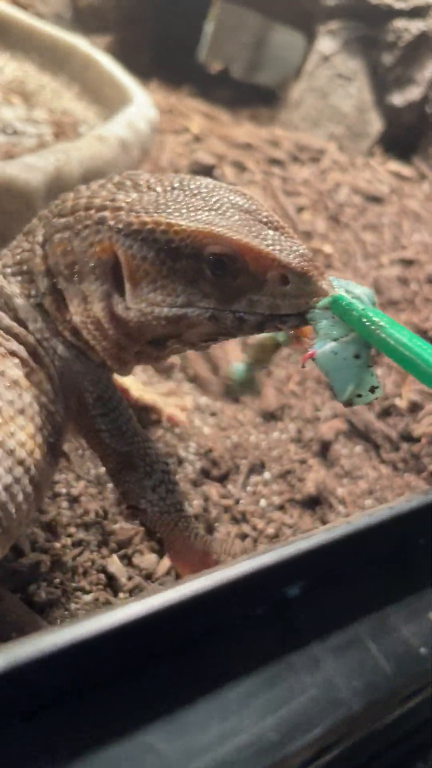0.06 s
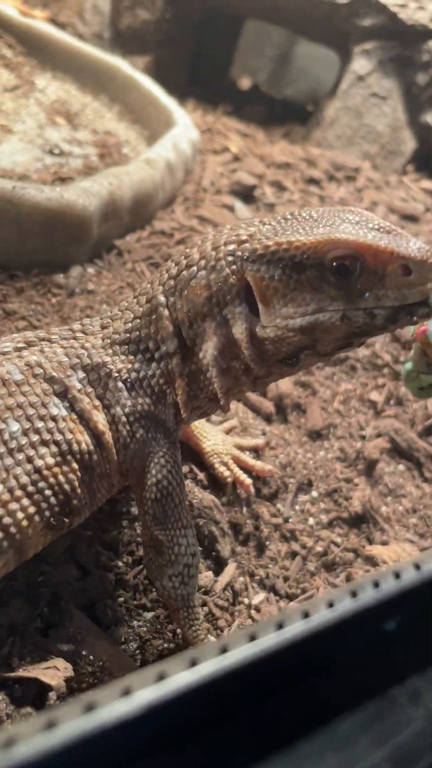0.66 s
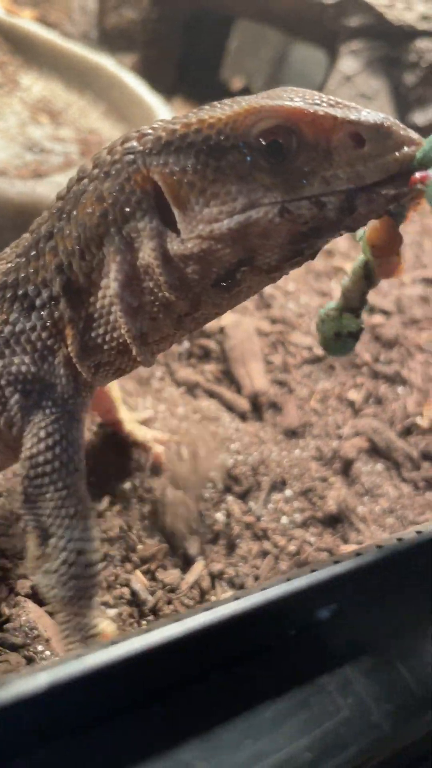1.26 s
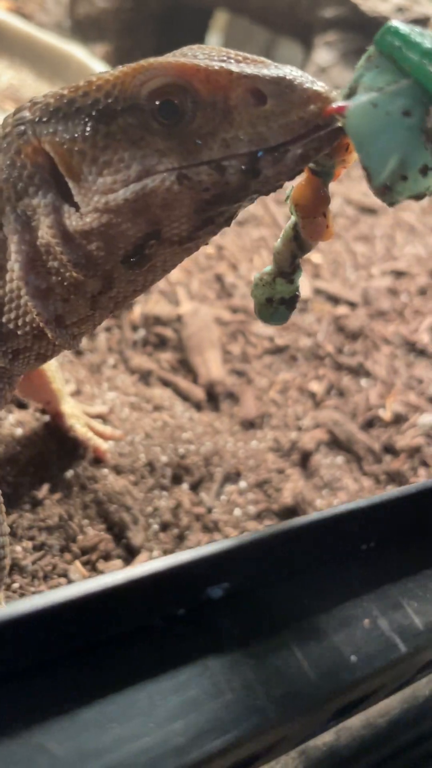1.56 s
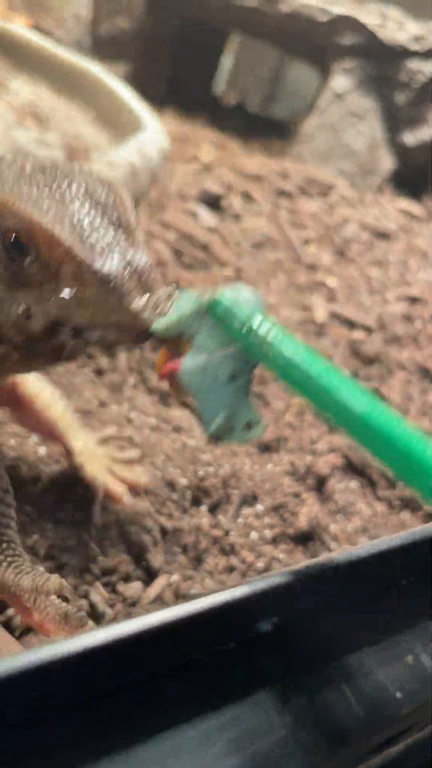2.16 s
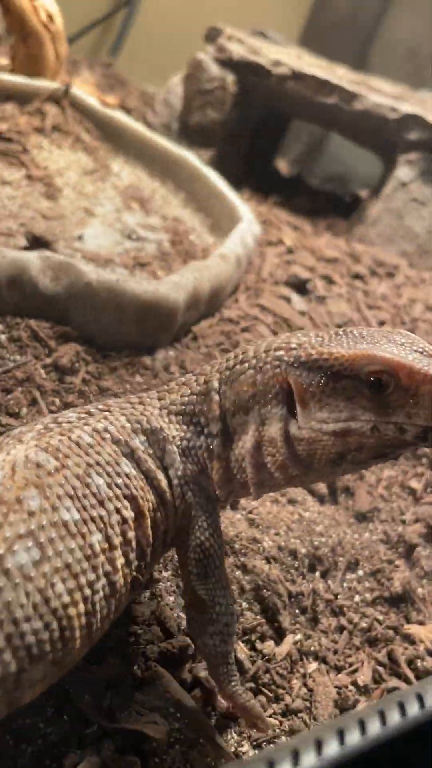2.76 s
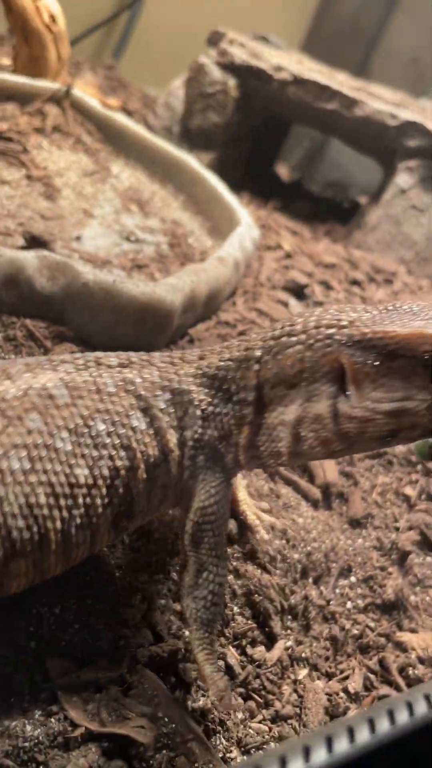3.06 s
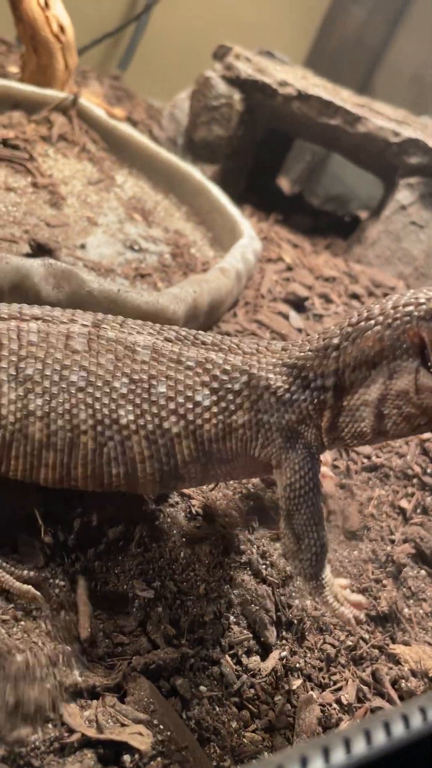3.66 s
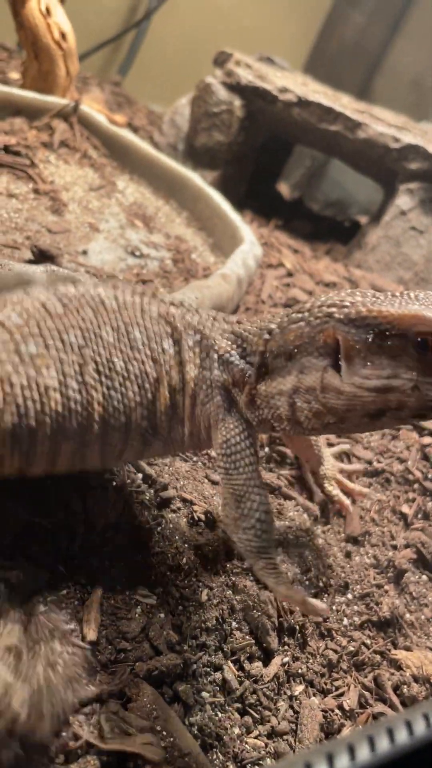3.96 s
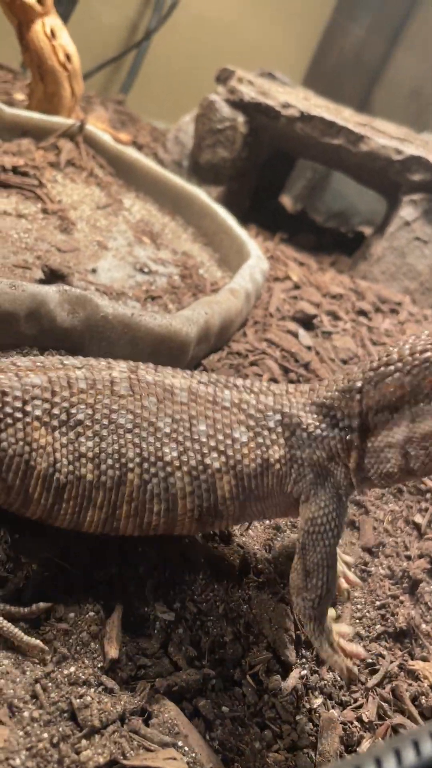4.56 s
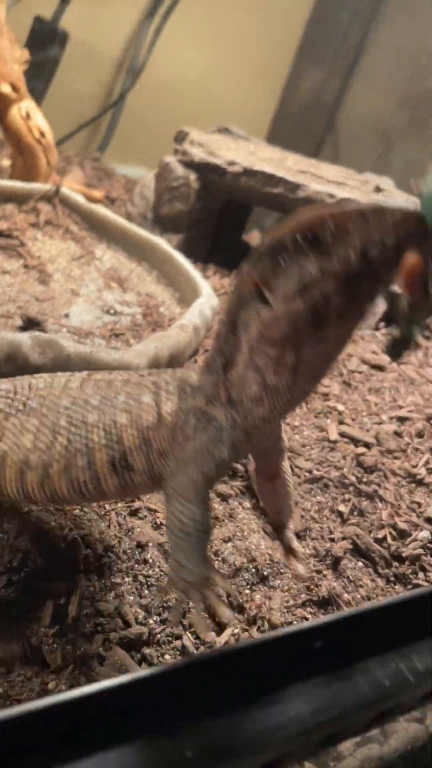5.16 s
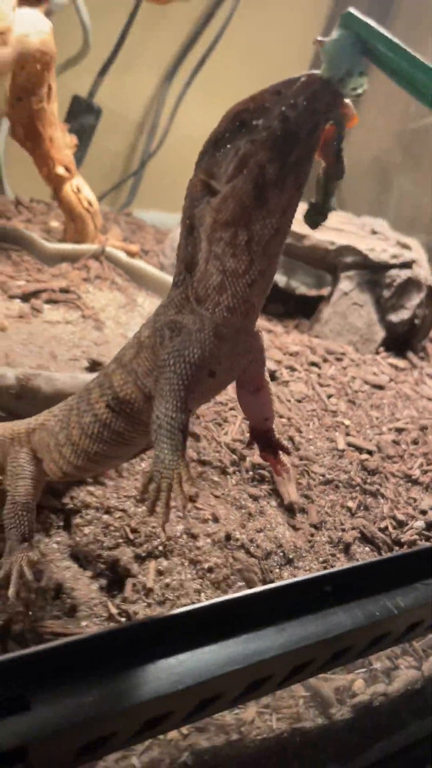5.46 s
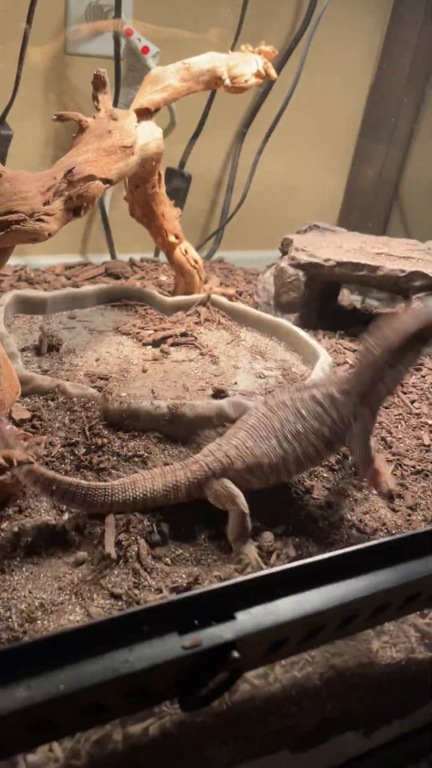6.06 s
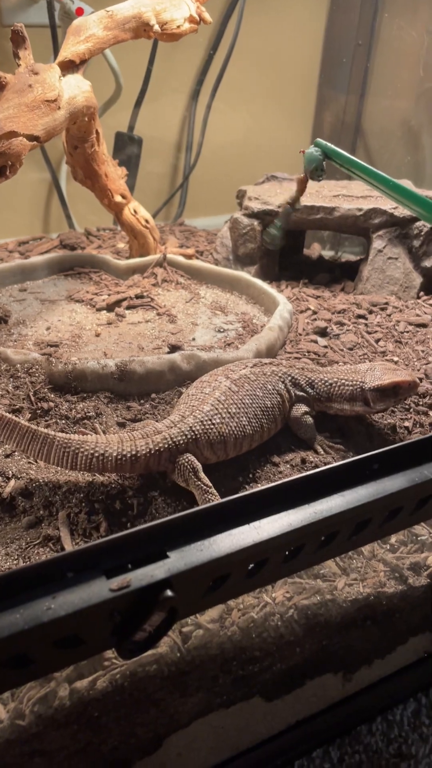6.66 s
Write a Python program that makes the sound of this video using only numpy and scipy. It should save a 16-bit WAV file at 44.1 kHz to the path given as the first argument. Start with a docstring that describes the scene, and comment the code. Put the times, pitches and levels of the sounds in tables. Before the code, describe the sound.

A lizard moves through bark litter in a glass tank, heard close over a faint, low room hum. At about 0.2 seconds plastic tongs knock on the tank in a quick clatter, amid claw scratches, soft thuds and snapping chips. It goes quieter around 1 second, with thin rubbing and tiny clicks from the tongs. Sharper clicks start at 2 seconds and lead to a hard clack and knock at 2.3. From 2.4 to 4.7 seconds the claws scrabble lightly and feet thud, with the crackling of bark thickest between 3.4 and 4. From about 5 seconds the belly drags with a soft rasp. At 6.1 comes the loudest sound, a sharp knock as the lizard drops, ringing the panes and making the whole tank boom. One small click follows at 6.4, then a faint, dull rustle as the tongs withdraw.

```python
"""Claws scrabble in bark litter, over a quiet room hum: a monitor lizard in a glass tank, close to a phone.
Feet thud, chips snap and the belly drags as it tugs at a worm held in plastic tongs.
The tongs knock on the tank, rub and click; each knock rings the panes and the floor.
At last the lizard lets go and drops, the whole tank booms, and the tongs rustle as they are drawn back."""
import sys
import numpy as np
from scipy import signal
from scipy.fft import rfft, irfft, next_fast_len
from scipy.io import wavfile
from scipy.ndimage import uniform_filter1d, map_coordinates

SR = 44100
rng = np.random.default_rng(int(sys.argv[2]) if len(sys.argv) > 2 else 0)


def generate_wav(signal):
    """Clip the signal to [-1, 1] and save it as 16-bit WAV at the path in sys.argv[1]."""
    frames = np.transpose(np.atleast_2d(signal))
    scaled = np.clip(frames, -1, 1) * 32767
    pcm = np.round(scaled).astype(np.int16)
    wavfile.write(sys.argv[1], SR, pcm)


N = 304731

# claw strokes; belly and tail drags: (time [s], length [s], scraping [dB], crumbs [dB])
CLAW_STROKES = [(-.02, 0.07, -56, -59.5), (.09, 0.11, -72.5, -68.5), (.21, 0.26, -65.5, -63.5),
                (.465, 0.12, -61.5, -63.5), (.61, 0.24, -72.5, -66.5), (.93, 0.13, -79, -76),
                (1.24, 0.072, -89, -75.5), (1.872, 0.14, -69, -63.5), (1.965, 0.053, -66, -60.5),
                (2.05, 0.077, -78, -71), (2.14, 0.23, -68, -64.5), (2.39, 0.34, -74, -69),
                (2.765, 0.11, -65, -62), (3.06, 0.35, -70, -67), (3.345, 0.15, -62, -63.5),
                (3.53, 0.12, -60.5, -59.5), (3.71, 0.14, -70, -67.5), (3.9, 0.046, -63, -58),
                (3.94, 0.051, -59, -54.5), (4.0, 0.055, -63.5, -67), (4.265, 0.066, -72.5, -67),
                (4.4, 0.29, -73, -69), (5.11, 0.18, -67, -84)]
BELLY_DRAGS = [(2.93, 0.066, -72, -70.5), (4.24, 0.0089, -68, -62), (4.88, 0.23, -77.5, -89),
               (5.045, 0.14, -69.5, -64), (5.15, 0.24, -61.5, -66), (5.51, 0.33, -62, -60.5),
               (5.92, 0.16, -60.5, -67), (6.15, 0.24, -66.5, -86), (6.76, 0.082, -74.5, -75)]
# footfalls and tugs on the tank floor: (time [s], ring [dB], thud [dB])
FOOTFALLS = [(0.041, -67, -54.5), (0.202, -64, -52), (0.5, -62, -59), (.522, -54, -46.5), (1.967, -57, -61),
             (2.034, -76, -54.5), (2.271, -48, -65), (2.78, -69, -65), (3.449, -57.5, -62),
             (3.551, -60, -60.5), (3.735, -61, -60.5), (3.85, -59, -58), (3.924, -59, -66),
             (4.06, -58, -55.5), (4.63, -57, -59), (5.225, -56.5, -54)]
# bark chips breaking: (time [s], level [dB], tilt [dB/octave])
CHIP_SNAPS = [(0.0702, -43, 0), (.519, -53, -3), (.5305, -48.5, -2.5), (.545, -42.5, 0.5), (0.5515, -40, 7),
              (0.338, -49, 14), (2.4036, -51.5, 6), (2.57, -52, 3), (2.866, -52.5, 1.5), (3.388, -50.5, -2),
              (3.425, -51, 0), (3.499, -49, -2), (3.5516, -42.5, -2.5), (3.604, -50, -1), (3.615, -46.5, 1),
              (3.625, -53, -1), (3.782, -52, 0.5), (3.817, -55, -1), (3.873, -49, 3.5), (3.879, -56, 8),
              (3.901, -41.5, 6.5), (3.934, -43.5, 8), (3.941, -41, -0.5), (3.947, -43.5, 0),
              (3.975, -47, 12), (3.993, -47, 16), (4.459, -49, 12), (4.662, -55, 8), (4.679, -46, -1.5),
              (6.446, -56, 14)]
# blows on the tank:
# (time [s], crack [dB], clack [dB], rattle [dB], decay scale [x], tilt [dB/octave], boom [dB])
TANK_KNOCKS = [(0.1297, -51, -67, -75, 0.29, 3, -84), (0.1901, -34, -42.5, -53, 0.28, -1.5, -63),
               (0.203, -42, -63, -47, 0.54, 0.5, -55.5), (0.246, -49, -48, -62, 0.34, 4, -75),
               (1.392, -67, -93, -84, 0.4, -16, -75), (2.2541, -33, -35.5, -42, 0.25, 0.5, -42.5),
               (5.555, -53.5, -70, -85, 0.17, -7, -81), (5.93, -52, -63, -67.5, 0.59, -5.5, -62.5),
               (6.0751, -23, -26, -33.5, 0.73, 4, -26), (6.0848, -27, -32, -46, 0.86, -3, -53),
               (6.201, -51, -57, -57, 1, -2, -45)]
# tongs sliding under load: (time [s], length [s], level [dB])
TONG_SLIDES = [(.29, 0.17, -69.5), (1.01, 0.063, -78.5), (1.175, 0.12, -71.5), (1.272, 0.05, -68),
               (1.97, 0.033, -62.5), (2.46, 0.059, -64.5), (2.53, 0.06, -71.5)]
# tong and jaw contacts, plus the bright treble of the landing crack at 6.076 s: (time [s], level [dB], pitch
# [Hz], width [octaves], t60 [s], rattle [dB])
HARD_CLICKS = [(0.472, -51.5, 2676, 0.019, 0.064, -70), (1.1457, -54.5, 3580, 0.31, 0.023, -68),
               (1.163, -49.5, 3300, 0.19, 0.027, -74), (1.661, -60.5, 11100, 0.84, 0.0061, -101),
               (1.9927, -33, 6850, 0.68, 0.026, -62), (2.091, -47, 6160, 0.39, .014, -64),
               (2.113, -48.5, 5300, 0.4, 0.02, -84.5), (2.209, -50.5, 4300, 0.75, 0.027, -64.5),
               (2.2786, -23, 4150, 0.32, 0.019, -47.5), (2.2784, -28, 10000, 0.83, 0.014, -70),
               (5.446, -44, 3840, 0.42, 0.015, -59.5), (6.0759, -36, 10000, 0.48, .05, -75),
               (6.388, -53, 8000, .6, 0.0079, -90), (6.3977, -37, 5260, 0.69, 0.015, -89)]
# litter pushed aside: (time [s], level [dB], pitch [Hz], t60 [s])
FOOT_SCUFFS = [(2.759, -51, 2670, 0.17), (3.365, -52.5, 1890, 0.27), (5.333, -49, 5070, 0.18)]
# room hum: (frequency [Hz], level [dB])
HUM_TONES = [(59.5, -78), (362, -83.5)]

# modes of floor and walls, panes, glass front: (frequency [Hz], level [dB], t60 [s])
TANK_MODES = [(54.4, -20, 1.8), (87.2, -11.5, 1.0), (96.1, -7.5, 1.61), (105.5, 3.5, 0.33),
              (113.6, -5.5, .45), (142.3, -15.5, 0.67), (149.2, -6, 0.85), (168, -12, 1.1),
              (182, -12.5, 0.52), (200.1, -6, 0.75), (205.8, 0, 0.33), (218.7, -4, 0.54), (257, -19, 0.31),
              (275, -10, 0.52), (311.5, -27, 1.8)]
PANE_MODES = [(449, 9, 0.22), (480, 3.5, 0.56), (534, 6.5, 0.67), (560, -4.5, 0.99), (656, 8.5, 0.2),
              (717, 3.5, 0.45), (817, 6.5, 0.32), (1103, 2, 0.66), (1318, 11.5, 0.18), (1556, 4, 0.23),
              (1813, 11, 0.2), (1870, -3, 0.14), (2260, 2.5, 0.15), (2300, 4.5, 0.29), (2840, 1, 0.14),
              (3120, 9, 0.28)]
FRONT_MODES = [(406.6, -10, 0.079), (690, -27.5, .05), (1223, -2.5, 0.034), (1786, -3, 0.055),
               (2300, -9.5, 0.079), (3550, 0.5, 0.015)]

# noise spectra, by source: (frequency [Hz], density [dB])
ROOM_SPECTRUM = [(20, -15.5), (60, 7.5), (110, 2), (200, -6), (380, -9), (600, -16), (1500, -21.5),
                 (4000, -28), (12000, -35), (16000, -39)]
CLAW_SPECTRUM = [(100, -18.5), (240, 2.5), (400, 9), (720, 1.5), (1050, 1.5), (1800, 2), (2750, 1.2),
                 (4000, -2.5), (5500, 2), (6700, -8), (8000, -15.5), (11000, -8.5), (16000, -5)]
BELLY_SPECTRUM = [(100, -20), (400, -11.5), (900, -0.5), (1600, 2.5), (2600, 7), (3500, 3.5), (5000, 4),
                  (6500, -2), (8000, -4.5), (11000, -7), (16000, -14.5)]
CRUMB_SPECTRUM = [(2000, -28), (5000, -3.5), (8000, 0), (11000, -2.5), (13500, -7), (15500, 1)]
CHIP_SPECTRUM = [(100, -14), (400, 4), (900, -2), (2500, -4), (5500, 0), (8000, -5), (11000, -7),
                 (16000, -11)]
WEIGHT_SPECTRUM = [(20, -22), (45, -1.5), (65, -4.5), (100, 4.5), (140, 0), (200, -11), (300, -13),
                   (500, -16), (1200, -42)]
THUD_SPECTRUM = [(20, -24), (45, -8), (65, 7), (110, 5.5), (170, 7), (260, -15.5), (600, -34.5)]
CRACK_SPECTRUM = [(60, -18.5), (200, -15), (350, -7.5), (600, 3), (950, -1.5), (1700, 0.5), (2400, -3.5),
                  (3500, -3.5), (6000, -11.5), (9000, -20.5), (12000, -32.5), (16000, -25.5)]
TANK_RATTLE_SPECTRUM = [(40, -11.5), (150, -6), (330, 7), (600, 7), (1300, 6.5), (2500, 2), (4500, -1),
                        (7000, -8), (11000, -19.5), (16000, -33)]
RUMBLE_SPECTRUM = [(25, -22), (50, -9), (70, -1), (90, -5), (125, -1.5), (200, -2), (300, -10), (400, -24),
                   (1000, -54.5)]
SLIDE_SPECTRUM = [(1200, -32), (2700, -12), (3000, 1), (3450, 2), (3850, -8), (4450, -6), (4800, -14),
                  (5800, -14), (6600, -10), (8500, -19), (11000, -26), (15000, -33)]
TONG_RATTLE_SPECTRUM = [(1200, -30), (1650, -11), (2500, -3.5), (2900, -9), (3600, -1), (3950, -5),
                        (4450, 0), (5200, -14.5), (8000, -15), (9000, -21), (11000, -39), (16000, -47)]
RUSTLE_SPECTRUM = [(200, -17.5), (450, -4), (700, -4.5), (1200, -8.5), (2000, -7), (5000, -19),
                   (16000, -59)]

# decay of the tank air: (frequency [Hz], t60 [s])
AIR_T60_S = [(100, 0.58), (300, 1), (700, 0.82), (1500, 0.47), (4000, 0.38), (8000, 0.22), (16000, 0.51)]
# stereo position of the knocks: (frequency [Hz], left minus right [dB])
KNOCK_BALANCE_DB = [(60, -0.5), (150, -2), (380, -4), (950, 0.5), (2380, 0), (5980, -0.5), (15000, 2)]
# left-right likeness of near and far sound: (frequency [Hz], coherence [0-1])
NEAR = [(150, 0.97), (400, 0.45), (800, 0.23), (1500, 1), (3000, 0.9), (4300, 0.4), (6000, 1), (11000, 1),
        (16000, 1)]
FAR = [(150, 0.89), (350, 0.17), (700, 0.083), (1400, 0.47), (3000, 0.51), (5000, 0.51), (8000, 1),
       (16000, 0.41)]
# lead of the left microphone port: (frequency [Hz], phase [rad])
PORT_LEAD_RAD = [(0, 0), (1900, .05), (2900, .75), (4100, .65), (4900, 0), (7650, 3.14), (11000, 6.28),
                 (14300, 9.42), (16000, 10.8)]

FLOOR_DRIFT_HZ, PANE_DRIFT_HZ = 1.84, 3.5  # loose floor and panes never hold one pitch
FLOOR_PAN_DB = [[-.7], [.7]]  # left, right


def amp(db):
    """Decibels to gain."""
    return 10 ** (np.asarray(db) / 20)


def unit(x):
    """x at rms 1."""
    return x / np.sqrt(np.mean(x ** 2) + 1e-20)


def along(points, hz):
    """(Hz, value) points read on a log axis."""
    knots_hz, values = np.transpose(points)
    return np.interp(np.log(hz + 1), np.log(knots_hz + 1), values)


def wobble(knots_per_s):
    """Smooth random curve."""
    knots = rng.standard_normal(int(N * knots_per_s / SR) + 4)
    return map_coordinates(knots, [np.arange(N) * knots_per_s / SR])


def add(track, time_s, sound):
    """Mix a sound into the track."""
    start = max(0, round(time_s * SR))
    track[:, start:start + sound.shape[-1]] += sound[..., :N - start]


def filtered(x, response):
    """x through a frequency response."""
    size = x.shape[-1]
    padded = next_fast_len(size + 8192)
    return irfft(rfft(x, padded) * response(np.fft.rfftfreq(padded, 1 / SR)), padded)[..., :size]


def stereo(pair, colour_db, coherence):
    """Two unrelated signals, coloured and blended into left and right at rms 1."""
    angle = lambda hz: np.arccos(np.clip(along(coherence, hz), -1, 1)) / 2
    mid, side = filtered(pair, lambda hz: amp(colour_db(hz)) * [np.cos(angle(hz)), np.sin(angle(hz))])
    return unit(np.array([mid + side, mid - side]))


def noise(spectrum, coherence, size=N, tilt_db=0):
    """Shaped stereo noise, tilted per octave above 500 Hz."""
    colour_db = lambda hz: along(spectrum, hz) + tilt_db * np.log2(1 + hz / 500)
    return stereo(rng.standard_normal((2, size)), colour_db, coherence)


def fade(t60_s, attack_s):
    """Rise, then exponential decay."""
    t = np.arange(int(SR * np.clip(1.5 * t60_s, .05, 1.5))) / SR
    return np.exp(-np.log(1000) * t / t60_s) * (1 - np.exp(-t / attack_s))


def burst(spectrum, coherence, t60_s, attack_s, tilt_db=0):
    """Decaying puff of stereo noise."""
    envelope = fade(t60_s, attack_s)
    return envelope * noise(spectrum, coherence, len(envelope), tilt_db)


def ring(modes, attack_s, scatter_db, decay_scale=1, drift_hz=0):
    """Struck modes, each with random strength and optional pitch drift."""
    t = np.arange(SR) / SR
    knots_s = np.linspace(0, 1, 25)
    tones = np.zeros(SR)
    for hz, db, t60_s in modes:
        envelope = amp(db + scatter_db * rng.normal()) * np.exp(-np.log(1000) * t / (decay_scale * t60_s))
        drift_cycles = np.cumsum(rng.standard_normal(len(knots_s))) * drift_hz / len(knots_s)
        tones += envelope * np.sin(2 * np.pi * (hz * t + np.interp(t, knots_s, drift_cycles)))
    return tones * (1 - np.exp(-t / attack_s))


def effort(moves, rise_s, fall_db_per_s):
    """Movements swell, hold and die away; summed in power, one gain curve per dB column."""
    power = 0
    for time_s, length_s, *levels_db in moves:
        t = np.arange(N) / SR - time_s
        swell = (1 + np.tanh(t / (2 * rise_s))) / 2
        release = amp(-fall_db_per_s * np.maximum(t - length_s, 0))
        power += np.outer(amp(levels_db), swell * release) ** 2
    return np.sqrt(power)


def grains(spectrum, coherence, per_s, spread_db, bed_gain):
    """Tiny fractures of uneven size over a bed of finer friction."""
    sizes = amp(spread_db * np.minimum(rng.exponential(size=(2, N)), 4)) * rng.standard_normal((2, N))
    fractures = unit(sizes * (rng.random((2, N)) < per_s / SR))
    friction = bed_gain * rng.standard_normal((2, N))
    return stereo(fractures + friction, lambda hz: along(spectrum, hz), coherence)


def bark_patches(x, depth_db):
    """Each patch of bark has its own colour, so resonances come and go."""
    frames = signal.stft(x, SR, nperseg=512)[2]
    smooth = lambda v, size, axis: uniform_filter1d(uniform_filter1d(v, size, axis), size, axis)
    field = smooth(smooth(rng.standard_normal(frames.shape[1:]), size=4, axis=0), size=20, axis=1)
    gain = amp(depth_db * np.tanh(unit(field)))
    return signal.istft(frames * unit(gain), SR, nperseg=512)[1][:, :N]


def pane_reflections(x, spread_s, strength):
    """Early copies off nearby panes comb the sound."""
    delays_s = 0.000558 + spread_s * rng.random(8)
    gains = rng.standard_normal(8)
    gains *= strength / np.linalg.norm(gains)
    copies = lambda hz: sum(gain * np.exp(-2j * np.pi * hz * s) for s, gain in zip(delays_s, gains))
    return filtered(x, lambda hz: (1 + copies(hz)) / np.sqrt(1 + strength ** 2))


def air_decay(x, decay_scale):
    """Sound dies away in the tank, treble first."""
    hz, t, frames = signal.stft(x, SR, nperseg=256)
    loss = np.exp(-np.log(1000) * t / (decay_scale * along(AIR_T60_S, hz)[:, None]))
    return signal.istft(frames * loss, SR, nperseg=256)[1][:, :x.shape[1]]


def wall_echo(x, wet_db, decay_scale):
    """The glass walls throw small sounds back."""
    tail = air_decay(rng.standard_normal((2, SR // 2)), decay_scale)
    tail = np.pad(tail / np.linalg.norm(tail[0]), ((0, 0), (SR // 400, 0)))  # 2.5 ms delay
    return x + amp(wet_db) * signal.fftconvolve(x, tail, axes=1)[:, :N]


def scrabble():
    """Claws dig and the belly drags through clumps of bark; the weight rumbles in the tank floor."""
    dig, dig_crumbs = effort(CLAW_STROKES, rise_s=0.006, fall_db_per_s=201)
    drag, drag_crumbs = effort(BELLY_DRAGS, rise_s=0.034, fall_db_per_s=89)
    clumps_db = 1.6 * wobble(45) + 0.45 * wobble(170)
    rough, smooth = amp(clumps_db), amp(.5 * clumps_db)
    claws = grains(CLAW_SPECTRUM, NEAR, per_s=1100, spread_db=0, bed_gain=1)
    belly = grains(BELLY_SPECTRUM, FAR, per_s=6100, spread_db=4, bed_gain=4.6)
    crumbs = grains(CRUMB_SPECTRUM, NEAR, per_s=1300, spread_db=-0.5, bed_gain=1)
    grit = amp(-7.5) * grains(CHIP_SPECTRUM, NEAR, per_s=200, spread_db=-1, bed_gain=0)
    litter = rough * dig * (claws + grit) + smooth * drag * belly
    litter += np.hypot(rough * dig_crumbs, smooth * drag_crumbs) * crumbs
    press = lambda gain: (gain / gain.max()) ** 0.64  # dB of rumble per dB of scraping
    weight = np.hypot(amp(-58.5) * press(dig), amp(-70) * press(drag)) * noise(WEIGHT_SPECTRUM, NEAR)
    litter = bark_patches(litter, depth_db=2.5)
    return pane_reflections(litter, spread_s=0.021, strength=0.027) + amp(FLOOR_PAN_DB) * weight


def room():
    """Low room air and a faint, wavering hum."""
    t = np.arange(N) / SR
    waver = lambda: unit(wobble(30) + 1j * wobble(30)) + .1
    hum = sum(amp(db) * unit(np.real(waver() * np.exp(2j * np.pi * hz * t))) for hz, db in HUM_TONES)
    return amp(-73) * noise(ROOM_SPECTRUM, FAR) + hum


def steps():
    """Feet land softly through the litter: a deep thud and the tank's low modes."""
    out = np.zeros((2, N))
    for time_s, ring_db, thud_db in FOOTFALLS:
        floor = ring(TANK_MODES, attack_s=0.018, scatter_db=1.5, decay_scale=0.64, drift_hz=FLOOR_DRIFT_HZ)
        add(out, time_s, amp(ring_db) * floor)
        add(out, time_s, amp(thud_db) * burst(THUD_SPECTRUM, NEAR, t60_s=.27, attack_s=0.0069))
    return amp(FLOOR_PAN_DB) * filtered(out, lambda hz: 2 / (1 + 1j * hz / 130) ** 2)  # low-pass


def snaps():
    """Single chips break under the claws in short, broad bursts."""
    out = np.zeros((2, N))
    for time_s, db, tilt_db in CHIP_SNAPS:
        snap = burst(CHIP_SPECTRUM, NEAR, t60_s=0.021, attack_s=0.00085, tilt_db=tilt_db)
        add(out, time_s, amp(db) * snap)
    return out


def knocks():
    """A blow cracks, clacks, rattles round the tank and rings the panes; the heavy floor follows."""
    out = np.zeros((2, N))
    for time_s, crack_db, clack_db, rattle_db, decay_scale, tilt_db, boom_db in TANK_KNOCKS:
        crack = burst(CRACK_SPECTRUM, NEAR, t60_s=0.036, attack_s=0.001, tilt_db=tilt_db)
        rattle = air_decay(noise(TANK_RATTLE_SPECTRUM, FAR, size=SR, tilt_db=tilt_db), decay_scale)
        add(out, time_s, amp(crack_db) * pane_reflections(crack, spread_s=0.0029, strength=.3))
        add(out, time_s, amp(clack_db) * ring(FRONT_MODES, attack_s=0.002, scatter_db=0.5))
        add(out, time_s + .003, amp(rattle_db) * pane_reflections(rattle, spread_s=.008, strength=0.7))
        panes = ring(PANE_MODES, attack_s=0.0028, scatter_db=1.5,
                     decay_scale=decay_scale, drift_hz=PANE_DRIFT_HZ)
        boom = ring(TANK_MODES, attack_s=0.012, scatter_db=3,
                    decay_scale=decay_scale, drift_hz=FLOOR_DRIFT_HZ)
        rumble = burst(RUMBLE_SPECTRUM, NEAR, t60_s=1.45 * decay_scale, attack_s=.03)
        add(out, time_s, amp(rattle_db - 16) * panes)
        add(out, time_s + 0.00465, amp(boom_db) * boom)
        add(out, time_s + .005, amp(boom_db - 8) * rumble)
    return filtered(out, lambda hz: amp(along(KNOCK_BALANCE_DB, hz) * np.array([[.5], [-.5]])))


def slides():
    """Loaded tongs rub with a thin, uneven hiss."""
    gain, = effort(TONG_SLIDES, rise_s=0.012, fall_db_per_s=650)
    return gain * amp(1.2 * wobble(120)) * noise(SLIDE_SPECTRUM, FAR)


def clicks():
    """Hard contacts ring briefly round one pitch; the tong arms rattle on drily."""
    out = np.zeros((2, N))
    for time_s, db, pitch_hz, width_oct, t60_s, rattle_db in HARD_CLICKS:
        peak_db = lambda hz: -22 * np.log10(1 + (np.log2((hz + 1) / pitch_hz) / width_oct) ** 2 / 2)
        envelope = fade(t60_s, attack_s=.0003)
        click = envelope * stereo(rng.standard_normal((2, len(envelope))), peak_db, NEAR)
        add(out, time_s, amp(db) * click)
        add(out, time_s, amp(rattle_db) * burst(TONG_RATTLE_SPECTRUM, FAR, t60_s=.18, attack_s=0.00036))
    return out


def scuffs():
    """A foot pushes a small heap aside: the rasp swells and fades."""
    out = np.zeros((2, N))
    for time_s, db, hz, t60_s in FOOT_SCUFFS:
        spectrum = [(hz / 6, -26), (hz / 2, -9), (hz, 0), (hz * 2, -12), (hz * 4, -28)]
        add(out, time_s, amp(db) * burst(spectrum, NEAR, t60_s, attack_s=t60_s / 8))
    return out


def withdrawal(start_s=6.39, rise_s=0.39):
    """The tongs rustle dully as they are drawn back."""
    ramp = np.clip((np.arange(N) / SR - start_s) / rise_s, 0, 1)
    return amp(-71.5) * ramp * noise(RUSTLE_SPECTRUM, FAR)


def scene():
    """Lizard, tongs, tank and room."""
    movement = scrabble() + scuffs() + slides() + withdrawal() + knocks() + steps()
    return movement + wall_echo(clicks() + snaps(), wet_db=-9.5, decay_scale=0.12) + room()


def record(dry):
    """The phone's two ports hear the treble out of phase; steep band limit at 16 kHz."""
    phase_rad = lambda hz: np.interp(hz, *np.transpose(PORT_LEAD_RAD)) * np.array([[1], [-1]]) / 2
    return filtered(dry, lambda hz: np.exp(1j * phase_rad(hz)) / (1 + (hz / 16000) ** 120))


dry = scene()
out = record(dry)
generate_wav(out)
```